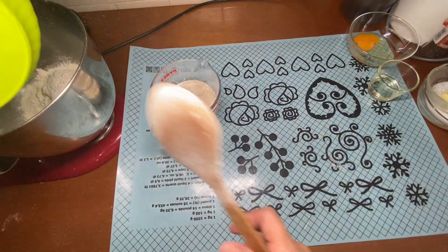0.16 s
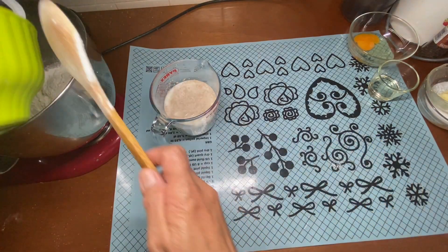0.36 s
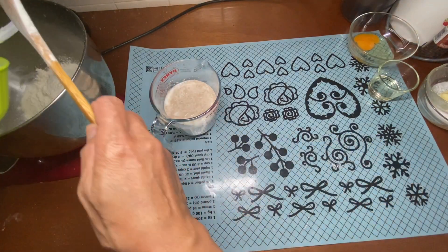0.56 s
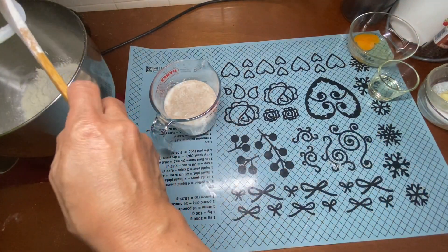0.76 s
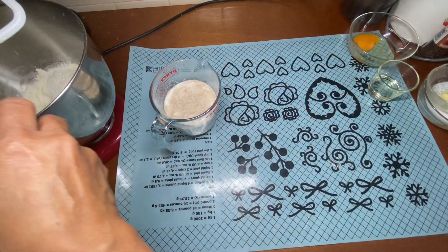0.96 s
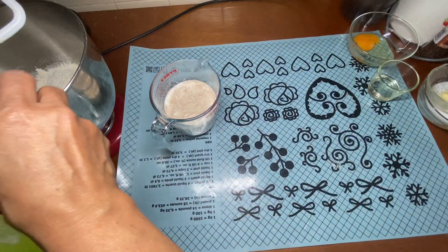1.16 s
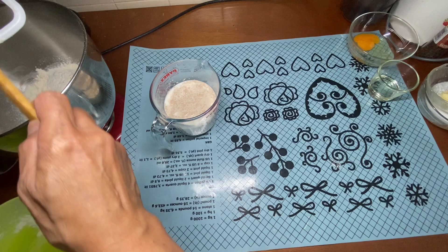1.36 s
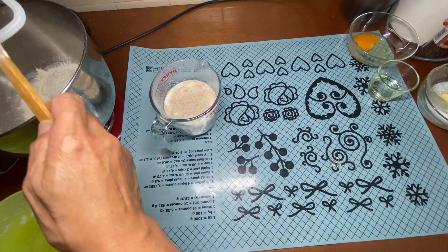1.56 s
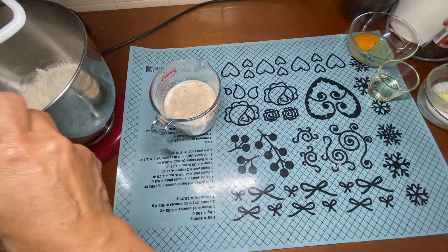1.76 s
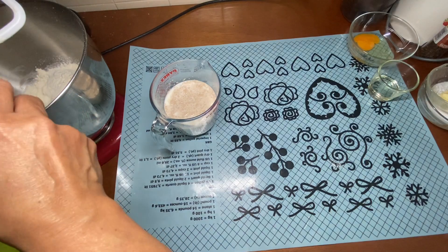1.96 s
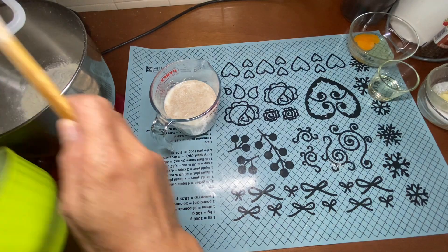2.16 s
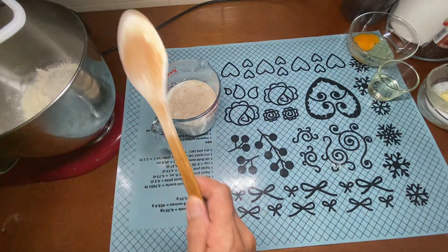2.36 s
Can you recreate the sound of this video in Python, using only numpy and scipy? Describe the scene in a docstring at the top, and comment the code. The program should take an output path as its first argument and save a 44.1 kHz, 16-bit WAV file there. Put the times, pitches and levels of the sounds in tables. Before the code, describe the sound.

A plastic bowl knocks on a steel mixer bowl, flour hisses out softly, then two louder hollow knocks and smaller clacks and bumps follow, close and slightly left in a quiet kitchen, in stereo.

```python
"""Emptying flour into a mixer bowl

A plastic bowl is knocked twice and rebounds on a mixer's steel bowl, close by on the left: both ring as modes.
Flour slides out as a soft, grainy band-noise hiss; clacks and ticks on the steel bowl are pulse, modes and noise.
Spoon and bowl rub in shaped noise; a light clink of modes dies away at the start, over a noise floor and drone.
"""
import sys
import numpy as np
from scipy import signal
from scipy.io import wavfile
from scipy.ndimage import uniform_filter1d, minimum_filter1d

SR = 44100
rng = np.random.default_rng(int(sys.argv[2]) if len(sys.argv) > 2 else 0)


def to_wav(s):
    """Save 16-bit WAV."""
    ch = np.atleast_2d(s).T  # columns
    pcm = np.round(np.clip(ch, -1, 1) * 32767)  # PCM
    wavfile.write(sys.argv[1], SR, pcm.astype(np.int16))


N = 110250
TIME = np.arange(N) / SR
BAND_HZ = 34 * 2 ** (np.arange(19) / 2)
LEFT_LEAD_S, LEFT_DB = 0.000525, 1.7   # right side gets the opposite dB


def from_db(db):
    """Decibels to gain."""
    return 10 ** (np.asarray(db) / 20)


def per_band(points, column=1):
    """One table column interpolated over log frequency at the band centres."""
    table = np.array(points)
    return np.interp(np.log(BAND_HZ), np.log(table[:, 0]), table[:, column])[:, None]


def ring(start_s, modes, build_s, alternate=True):
    """Decaying sine modes (hz, db, t60_s) set off together, arriving later on the right."""
    out = np.zeros((2, N))
    first = int(start_s * SR)
    for k, (hz, db, t60_s) in enumerate(modes):
        span = slice(first, first + int(1.5 * t60_s * SR))
        t = np.maximum(TIME[span] - start_s - np.array([[0], [LEFT_LEAD_S]]), 0)
        sign = (-1) ** (k * alternate)
        envelope = from_db(db - 60 * t / t60_s) * (1 - np.exp(-t / build_s))
        out[:, span] += sign * envelope * np.sin(2 * np.pi * hz * t)
    return out


def ring_at(start_s, level_db, modes, build_s, alternate=True):
    """Modes of one object, all raised by the level of the blow."""
    raised = [(hz, level_db + db, t60_s) for hz, db, t60_s in modes]
    return ring(start_s, raised, build_s, alternate)


def swell(crest_s, rise_s, fall_s, db):
    """Power of a Gaussian rise and fall."""
    away = (TIME - crest_s) / np.where(TIME < crest_s, rise_s, fall_s)
    return from_db(db) ** 2 * np.exp(-away ** 2)


def graininess(depth_db, per_s):
    """Random flutter in power: normal dB steps joined by straight lines."""
    count = int(per_s * N / SR) + 2
    steps = rng.standard_normal(N)[:count]
    return from_db(depth_db * np.interp(TIME * per_s, np.arange(count), steps)) ** 2


def resonant_noise(hz, width_hz):
    """Noise passed twice through one narrow resonance, rms 1."""
    b, a = signal.iirpeak(hz, hz / max(width_hz, 2), fs=SR)
    once = signal.lfilter(b, a, rng.standard_normal(N + SR))
    twice = signal.lfilter(b, a, once)[SR:]
    return twice / twice.std()


# knocks on the plastic bowl: start_s, ring_db, thud_db, middle_db, treble_db, place_0_to_1, steel_db
KNOCKS = [(0.2369, -18, -16, -12, -16, 0, -10.5), (.328, -53, -21, -28.5, -63, 0.5, -15),
          (1.2288, -8.5, -11.5, -13, -22, 0.88, -36), (1.3169, -17.5, -20.5, -22.5, -30.5, 0.84, -29.5),
          (1.449, -30.5, -27.5, -43.5, -56, 0.94, -43), (1.599, -45.5, -37.5, -52.5, -66, 0.92, -108),
          (1.933, -32, -31.5, -31, -43.5, 0.6, -46), (1.968, -47.5, -57, -35.5, -38.5, 0.1, -50),
          (2.399, -51.5, -53, -55, -72, .9, -50.5)]
# plastic bowl modes: pitch_hz, level_at_place_0_db, level_at_place_1_db, t60_s
PLASTIC_MODES = [(78.7, -26, -24, 0.081), (165.8, -4, -11, 0.15), (272, -8, -7.5, 0.22),
                 (319.1, 8, -14, 0.2), (362.9, -17, -20.5, 0.31), (463.1, -0.5, 4, 0.15),
                 (548.4, -7.5, -10.5, 0.16), (679, -9.5, -15, 0.12), (755, 2.5, -7.5, 0.12),
                 (1076, -0.5, -15.5, 0.13), (1220, -32, -17, .12), (1361, 0, -29, 0.058),
                 (1696, -37, -24.5, .13), (1844, -18, -25, 0.08), (1910, -18.5, -40, 0.14)]
# modes of the steel bowl on its stand: pitch_hz, level_db, t60_s
STEEL_MODES = [(112.2, -36, 1.1), (169, -29.5, 0.85), (220, -28, 0.61), (324.3, -11, 0.81),
               (393, -11, 0.33), (476, -13, 0.3), (543, -22.5, 1.1), (609, -16, 0.69), (697, -19.5, 0.53),
               (763, -42, 0.58), (955, -36, 0.69), (1060, -32, .35)]
BOWL_BUILD_S = 0.0021


def bowl_rings():
    """Each knock excites plastic modes by where it lands, and the steel bowl under it."""
    out = 0
    for start_s, ring_db, _, _, _, place, steel_db in KNOCKS:
        plastic = [(hz, db_0 + place * (db_1 - db_0), t60_s) for hz, db_0, db_1, t60_s in PLASTIC_MODES]
        out = out + ring_at(start_s, ring_db, plastic, BOWL_BUILD_S)
        out = out + ring_at(start_s, steel_db, STEEL_MODES, BOWL_BUILD_S)
    return out


ROOM_T60_S, ROOM_BUILD_S, ROOM_TREBLE_SHARE = 0.45, 0.0074, 0.44   # share: treble t60 / bass t60
BLOW_BUILD_CYCLES = 1.13   # each band builds up over this many cycles


def blow_power(start_s, body, low_db, middle_db, treble_db, crack_s, crack_db, top_db=0):
    """Power per band of one blow: dense decaying overtones, a crack above 1 kHz and a room tail."""
    power = np.zeros((len(BAND_HZ), N), np.float32)
    first = int(start_s * SR)
    t = TIME[:min(SR, N - first)].astype(np.float32)
    blow_db = [(350, low_db), (900, middle_db), (2200, middle_db), (6000, treble_db),
               (12000, treble_db + top_db)]
    gain = from_db(per_band(body) + per_band(blow_db))
    direct = np.exp(-np.log(1e6) * t / per_band(body, column=2))
    crack = (BAND_HZ[:, None] > 1000) * from_db(crack_db) ** 2 * np.exp(-t / crack_s)
    room_t60_s = ROOM_T60_S * per_band([(1000, 1), (10000, ROOM_TREBLE_SHARE)])
    room_decay = np.exp(-np.log(1e6) * t / room_t60_s) * (1 - np.exp(-t / ROOM_BUILD_S))
    tail = from_db(per_band(body, column=3)) ** 2 * room_decay
    build = np.minimum(t * BAND_HZ[:, None] / BLOW_BUILD_CYCLES, 1) ** 2
    power[:, first:first + len(t)] = gain ** 2 * (direct + crack + tail) * build
    return power


# overtones of a knock: band_hz, level_db, t60_s, room_tail_db
KNOCK_BODY = [(45.5, -39, 0.067, -3), (95, -26, 0.05, 5.5), (200, -24, 0.09, 6.5), (403, -15.5, 0.16, 2),
              (764, -5.5, 0.11, -10), (1140, -17.5, 0.023, -8.5), (2200, -22, 0.19, -8.5),
              (4500, -22.5, 0.063, -9.5), (7300, -26, 0.022, 2), (15300, -36, 0.083, -11)]
# overtones of a clack or tick: band_hz, level_db, t60_s, room_tail_db
CLACK_BODY = [(80, -34.5, 0.24, -11), (393, -17, 0.1, -13), (1130, -17.5, 0.16, -13.5),
              (2220, -12.5, 0.15, -11.5), (3720, -24, 0.056, -4.5), (8000, -25, 0.017, -3),
              (15200, -17.5, 0.015, -17)]
# clacks and ticks on the steel bowl: start_s, ring_db, low_db, middle_db, treble_db, top_change_db
CLACKS_AND_TICKS = [(0.707, -53.5, -24, -49, -53, -7), (1.395, -48, -19, -33, -27.5, -17),
                    (1.4289, -43.5, -17.5, -33.5, -27.5, -1.5), (1.799, -26, -19, -25.5, -28, -8)]
KNOCK_CRACK_S, KNOCK_CRACK_DB = 0.002, 3
CLACK_CRACK_S, CLACK_CRACK_DB = 0.001, 8
CLATTER_DB, CLATTERS_PER_S = 1.5, 180


def blows():
    """Power per band of all knocks, clacks and ticks, dying away unevenly."""
    power = 0
    for start_s, _, low_db, middle_db, treble_db, *_ in KNOCKS:
        power = power + blow_power(start_s, KNOCK_BODY, low_db, middle_db, treble_db,
                                   KNOCK_CRACK_S, KNOCK_CRACK_DB)
    for start_s, _, low_db, middle_db, treble_db, top_db in CLACKS_AND_TICKS:
        power = power + blow_power(start_s, CLACK_BODY, low_db, middle_db, treble_db,
                                   CLACK_CRACK_S, CLACK_CRACK_DB, top_db)
    return power * graininess(CLATTER_DB, CLATTERS_PER_S)


# rim-to-rim touches of the two bowls: start_s, level_db
RIM_TOUCHES = [(.3275, -20.5), (.7095, -48.5)]
# rim contact modes: pitch_hz, level_db, t60_s
RIM_MODES = [(596, -14, .49), (685, -2, 0.18), (764, 2.5, 0.1), (897, -10, 0.44), (1373, -20.5, 0.15),
             (1530, -26, 0.0091)]
RIM_BUILD_S = 0.00027


def rim_rings():
    """Short hollow notes where the rims meet, all modes starting with the same sign."""
    return sum(ring_at(start_s, db, RIM_MODES, RIM_BUILD_S, alternate=False) for start_s, db in RIM_TOUCHES)


# soft thumps of the bowl: start_s, level_db
THUMPS = [(.634, -36), (1.93, -26.5), (1.964, -40.5)]
# thump modes: pitch_hz, level_db, t60_s
THUMP_MODES = [(179, -22, 0.12), (267, -2.5, 0.15), (367, -0.5, 0.11), (540, -22, .17)]
THUMP_BUILD_S = 0.007


def thump_rings():
    """Dull, hollow modes of a soft contact, which build up slowly."""
    return sum(ring_at(start_s, db, THUMP_MODES, THUMP_BUILD_S) for start_s, db in THUMPS)


# flour slides: crest_s, rise_s, fall_s, level_db, coarse_db (below 9 kHz)
SLIDES = [(.115, 0.012, 0.027, -71, -11), (.768, 0.024, 0.057, -65, 1), (.848, 0.045, 0.029, -63, -0.5),
          (.93, 0.044, 0.051, -69.5, -1.5), (2.39, 0.078, 0.079, -75.5, -22)]
# flour spectrum: band_hz, level_db
FLOUR_SPECTRUM = [(200, -1.5), (1000, -23), (1700, -26), (2500, 1), (3400, -13), (4600, -6.5), (6200, -0.5),
                  (8000, -4), (11000, 1.5), (15000, -3)]
FLOUR_GRAIN_DB, GRAINS_PER_S = 5, 370


def flour():
    """Power per band of sliding powder; the coarse level spares the fine hiss at the very top."""
    sliding = 0
    for *shape, coarse_db in SLIDES:
        coarse_gain = from_db(per_band([(9000, coarse_db), (12000, 0)]))
        sliding = sliding + swell(*shape) * coarse_gain ** 2
    return from_db(per_band(FLOUR_SPECTRUM)) ** 2 * sliding * graininess(FLOUR_GRAIN_DB, GRAINS_PER_S)


# steel wall resonances: pitch_hz, width_hz, under_flour_db, under_knocks_db
WALL = [(1010, 230, -3, -44), (2413, 84, -3, -25), (4390, 640, -5.5, -25.5), (6130, 650, 3.5, -39.5),
        (8700, 760, -5.5, -37)]
WALL_T60_S = 0.21
WALL_FLUTTER_DB, WALL_FLUTTERS_PER_S = 2.5, 100


def steel_wall():
    """Resonant noise of the steel wall, stirred by sliding flour and by each knock."""
    sliding = sum(swell(*shape) * from_db(coarse_db) ** 2 for *shape, coarse_db in SLIDES)
    struck = 0
    for start_s, _, _, _, treble_db, *_ in KNOCKS:
        decay_db = treble_db - 60 * abs(TIME - start_s) / WALL_T60_S
        struck = struck + from_db(decay_db) ** 2 * (TIME > start_s)
    out = np.zeros((2, N))
    for side in range(2):
        for hz, width_hz, flour_db, knock_db in WALL:
            noise = resonant_noise(hz, width_hz)
            flutter = graininess(WALL_FLUTTER_DB, WALL_FLUTTERS_PER_S)
            power = from_db(flour_db) ** 2 * sliding * flutter + from_db(knock_db) ** 2 * struck
            out[side] += noise * np.sqrt(power)
    return out


# clack and tick modes: pitch_hz, level_db, t60_s
CLACK_MODES = [(486, -7.5, 0.082), (1295, -13, 0.2), (1467, -15, 0.11), (1743, -12, 0.055),
               (1840, -25, 0.14), (2489, -22.5, 0.27), (2580, -6, 0.05), (2775, 0, 0.076),
               (3830, -26, 0.099)]
CLACK_BUILD_S = 0.00027
PULSE_HZ, PULSE_DB, PULSE_LEFT_DB = 2220, 5, 6.5   # PULSE_DB re ring; right gets -PULSE_LEFT_DB


def clack_rings():
    """Each clack or tick is one short pressure pulse plus brief ringing modes."""
    out = 0
    sides = from_db([[PULSE_LEFT_DB], [-PULSE_LEFT_DB]])
    for start_s, ring_db, *_ in CLACKS_AND_TICKS:
        cycles = (TIME - start_s - np.array([[0], [LEFT_LEAD_S]])) * PULSE_HZ - 1
        pulse = -np.sin(2 * np.pi * cycles) * np.exp(-2 * cycles ** 2) * sides
        out = out + from_db(ring_db + PULSE_DB) * pulse
        out = out + ring_at(start_s, ring_db, CLACK_MODES, CLACK_BUILD_S)
    return out


# spoon and bowl rubs: crest_s, rise_s, fall_s, level_db, centre_hz
RUBS = [(.0, .02, 0.03, -44, 1920), (.13, 0.038, 0.04, -60, 4330), (0.582, 0.29, 0.12, -59.5, 2350),
        (1.14, 0.026, 0.04, -61.5, 4270), (1.88, 0.044, 0.077, -56.5, 7400),
        (2.132, 0.013, 0.042, -59.5, 4060), (2.259, 0.12, 0.077, -63.5, 2300)]
# rub spectrum: band_hz, level_db
RUB_SPECTRUM = [(200, 8), (800, 0), (1600, -5), (2800, -7), (4300, -7.5), (7000, -7.5), (10000, -15.5),
                (15000, -7)]
# soft bumps as the bowl is handled: crest_s, rise_s, fall_s, level_db, centre_hz
BUMPS = [(.006, 0.011, 0.036, -37.5, 235), (0.267, 0.011, 0.0092, -29, 85.6),
         (.537, 0.024, 0.032, -43.5, 165), (.652, 0.03, 0.023, -39.5, 376), (.835, 0.031, 0.021, -54, 333),
         (1.148, 0.011, 0.048, -51.5, 400), (1.628, 0.016, 0.026, -52.5, 445),
         (1.989, 0.026, 0.01, -39.5, 288), (2.026, 0.018, 0.01, -43, 182),
         (2.195, 0.04, 0.025, -46.5, 86.4), (2.418, 0.023, 0.022, -49, 510)]
RUB_DB_PER_OCTAVE, BUMP_DB_PER_OCTAVE = 4.5, 18.5
HANDLING_GRAIN_DB = 3.5


def handling():
    """Power per band of light rubs and dull bumps, falling off either side of their centres."""
    def around(hz, slope_db):
        """Band power falling by slope_db per octave from hz."""
        return from_db(-slope_db * abs(np.log2(BAND_HZ[:, None] / hz))) ** 2
    rubs = sum(around(hz, RUB_DB_PER_OCTAVE) * swell(*shape) for *shape, hz in RUBS)
    bumps = sum(around(hz, BUMP_DB_PER_OCTAVE) * swell(*shape) for *shape, hz in BUMPS)
    power = from_db(per_band(RUB_SPECTRUM)) ** 2 * rubs + bumps
    return power * graininess(HANDLING_GRAIN_DB, GRAINS_PER_S)


CONTACTS_PER_S = 350


def chatter(power, modes):
    """Clicks at random moments through two-pole resonators, with a random strength per mode and side."""
    at = np.flatnonzero(rng.random(N) < CONTACTS_PER_S / SR)
    out = 0
    for hz, db, t60_s in modes:
        radius = from_db(-60 / (t60_s * SR))
        angle = 2 * np.pi * hz / SR
        strength = rng.uniform(-0.74, 1, (2, N))[:, at]
        clicks = np.full((2, N), 1e-18)   # non-zero: avoids denormals
        clicks[:, at] = strength * np.sqrt(power[at] * (1 - radius ** 2) * SR / CONTACTS_PER_S)
        poles = [1, -2 * radius * np.cos(angle), radius ** 2]
        out = out + from_db(db) * signal.lfilter([np.sin(angle)], poles, clicks)
    return out


# bowl and spoon rattles on the rim: start_s, t60_s, level_db
RATTLES = [(0.269, 0.17, -29), (0.327, 0.34, -51), (1.229, 0.15, -26), (1.318, 0.35, -35.5),
           (1.396, 0.13, -32.5)]
# rattle modes: pitch_hz, level_db, t60_s
RATTLE_MODES = [(1345, -5.5, 0.037), (1745, -5.5, 0.022), (2010, -4, 0.065), (3220, -15, .02)]
# gritty scrapes: crest_s, rise_s, fall_s, level_db
SCRAPES = [(1.132, 0.015, 0.019, -57), (2.131, 0.012, 0.014, -49)]
# scrape modes: pitch_hz, level_db, t60_s
SCRAPE_MODES = [(1340, -2, 0.034), (3984, 2.5, 0.023), (4900, -3, .005)]
# light taps on the steel wall: start_s, level_db
PINGS = [(0.708, -50), (0.771, -48)]
PING_HZ, PING_T60_S, PING_BUILD_S = 2560, 0.077, 0.00027


def small_contacts():
    """Decaying rattles and swelling scrapes of tiny contacts, and single-mode pings of the steel wall."""
    settling = 0
    for start_s, t60_s, db in RATTLES:
        decay_db = db - 60 * abs(TIME - start_s) / t60_s
        settling = settling + from_db(decay_db) ** 2 * (TIME > start_s)
    rattles = chatter(settling, RATTLE_MODES)
    scrapes = chatter(sum(swell(*shape) for shape in SCRAPES), SCRAPE_MODES)
    pings = sum(ring(start_s, [(PING_HZ, db, PING_T60_S)], PING_BUILD_S) for start_s, db in PINGS)
    return rattles + scrapes + pings


# clink modes: pitch_hz, level_db, t60_s
CLINK_MODES = [(785, -36, 0.14), (1500, -44.5, 0.15), (2575, -48, 0.18), (3860, -41.5, 0.22),
               (3849, -52, 0.58), (5535, -49, 0.3)]
CLINK_S, CLINK_BUILD_S = 0.013, 0.01


def clink():
    """Light ringing modes that die away at the start."""
    return ring(CLINK_S, CLINK_MODES, CLINK_BUILD_S)


# left-right likeness of the noise: band_hz, shared_power_0_to_1
LIKENESS = [(60, 0.9), (300, 0.37), (700, 0.54), (1800, 0.11), (4000, 0.025), (12000, 0.085)]


def noise_bands():
    """Half-octave noise bands, 2 x bands x N, rms 1; the shared part reaches the left first."""
    run_in = 8000
    white = rng.standard_normal((2, 3, N + run_in))
    lag = int(LEFT_LEAD_S * SR)
    out = []
    for k, (hz, alike) in enumerate(zip(BAND_HZ, per_band(LIKENESS))):
        edges_hz = [hz / 2 ** .25, min(hz * 2 ** .25, .45 * SR)]
        sos = signal.butter(2, edges_hz, "band", fs=SR, output="sos")
        band = signal.sosfilt(sos, white[k % 2])   # neighbouring bands use separate noise
        band /= band.std()
        shared = np.array([band[0, run_in:], band[0, run_in - lag:-lag]])
        out.append(np.sqrt(alike) * shared + np.sqrt(1 - alike) * band[1:, run_in:])
    return np.stack(out, axis=1)


# early reflections off counter, wall and bowl: delay_left_s, delay_right_s, gain
REFLECTIONS = [(.0019, 0.0038, 0.035), (.0047, 0.0034, 0.16), (.0074, 0.0077, 0.38),
               (0.0139, 0.012, -0.058)]
REFLECT_ABOVE_HZ = 1700


def reflect(x):
    """Nearby surfaces add delayed copies of the treble."""
    bright = signal.sosfilt(signal.butter(2, REFLECT_ABOVE_HZ, "high", fs=SR, output="sos"), x)
    out = x
    for *delays_s, gain in REFLECTIONS:
        echo = [np.interp(TIME - delay_s, TIME, side, left=0) for delay_s, side in zip(delays_s, bright)]
        out = out + gain * np.array(echo)
    return out


# kitchen noise floor: band_hz, level_db
FLOOR = [(30, -83), (65, -63), (110, -62.5), (170, -70.5), (300, -67.5), (600, -61.5), (1200, -73),
         (2500, -77), (5000, -93), (10000, -89), (15000, -84.5)]


def kitchen_floor():
    """Steady power per band of the quiet kitchen."""
    return from_db(per_band(FLOOR)) ** 2


# steady kitchen drone: pitch_hz, width_hz, level_db
HUM = [(115.2, 17, -67), (172.8, 6.4, -63)]


def kitchen_hum():
    """Low drone of narrow resonant noise, the same on both sides."""
    return sum(from_db(db) * resonant_noise(hz, width_hz) for hz, width_hz, db in HUM)


CENTRED_BELOW_HZ, BASS_LEFT_DB = 250, 0.5   # right side gets the opposite dB


def scene():
    """Rings and noise of the bowls, a little to the left, over the quiet kitchen; bass nearer the centre."""
    bands = noise_bands()
    power = blows() + flour() + handling() + kitchen_floor()
    noise = (bands * np.sqrt(power)).sum(axis=1)
    rings = bowl_rings() + rim_rings() + thump_rings() + clack_rings() + clink()
    sound = reflect(noise + rings + steel_wall() + small_contacts()) + kitchen_hum()
    bass = signal.sosfiltfilt(signal.butter(2, CENTRED_BELOW_HZ, fs=SR, output="sos"), sound)
    bass_sides = from_db([[BASS_LEFT_DB], [-BASS_LEFT_DB]])
    upper_sides = from_db([[LEFT_DB], [-LEFT_DB]])
    return bass * bass_sides + (sound - bass) * upper_sides


LOW_CUT_HZ, CUTOFF_HZ = 35, 15900
LIMIT_DB, LIMIT_HOLD_S = -3.5, 0.0072


def record(dry):
    """Deepest bass rolls off, a limiter holds down the highest peaks, the top is cut steeply."""
    thinned = signal.sosfilt(signal.butter(4, LOW_CUT_HZ, "high", fs=SR, output="sos"), dry)
    size = max(int(LIMIT_HOLD_S * SR), 8)
    wanted = np.minimum(1, from_db(LIMIT_DB) / (abs(thinned).max(axis=0) + 1e-9))
    limited = thinned * uniform_filter1d(minimum_filter1d(wanted, size), size)
    return signal.sosfilt(signal.ellip(10, .2, 80, CUTOFF_HZ, fs=SR, output="sos"), limited)


dry = scene()
out = record(dry)
to_wav(out)
```